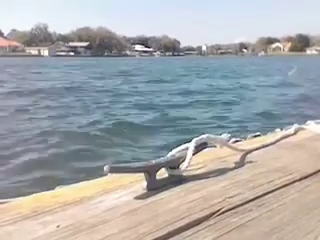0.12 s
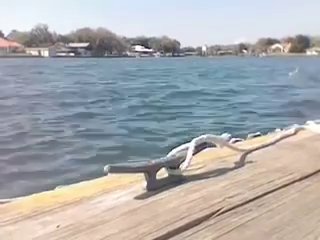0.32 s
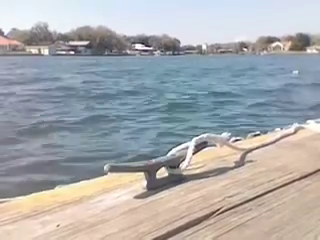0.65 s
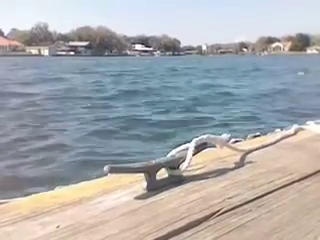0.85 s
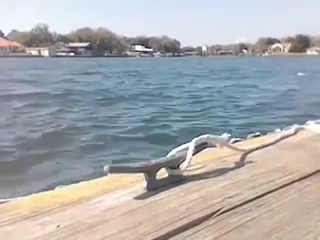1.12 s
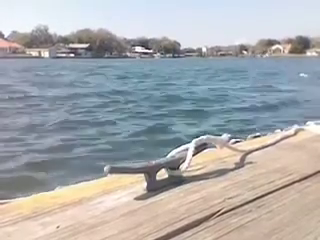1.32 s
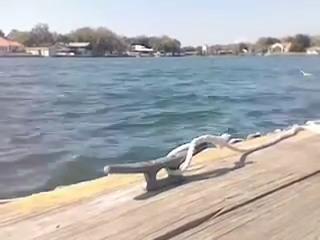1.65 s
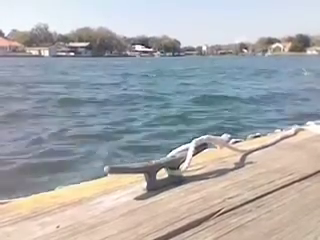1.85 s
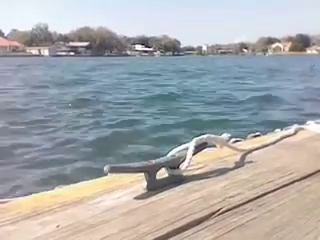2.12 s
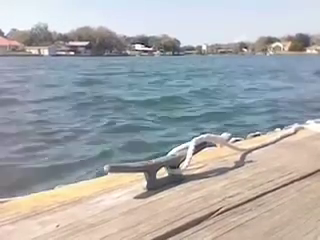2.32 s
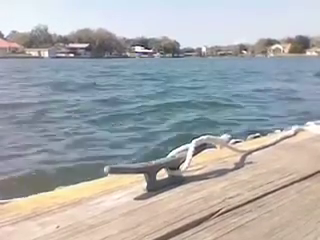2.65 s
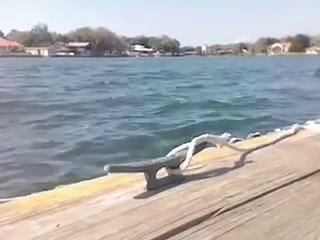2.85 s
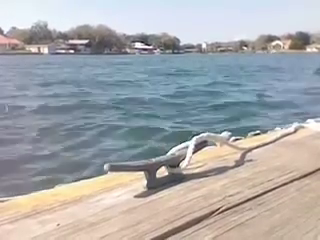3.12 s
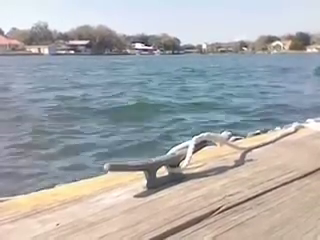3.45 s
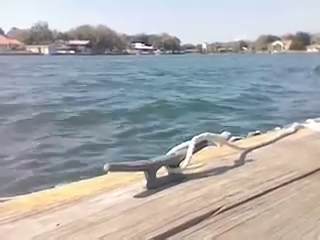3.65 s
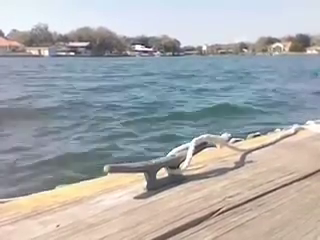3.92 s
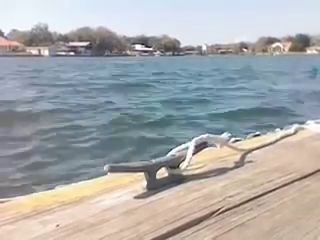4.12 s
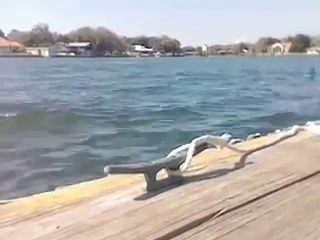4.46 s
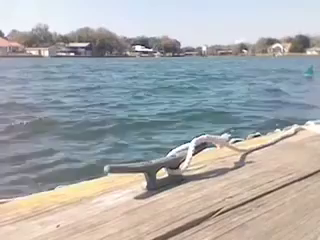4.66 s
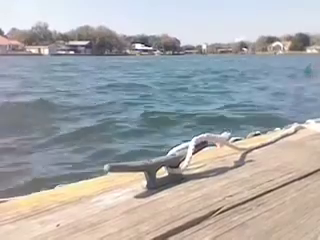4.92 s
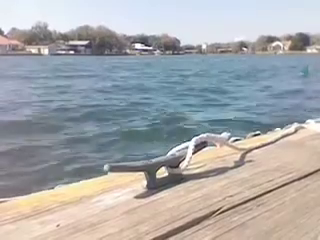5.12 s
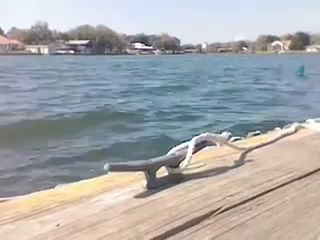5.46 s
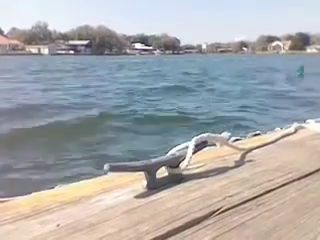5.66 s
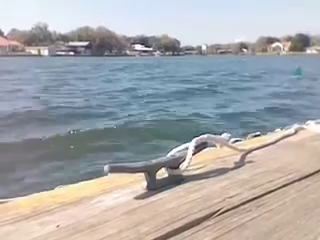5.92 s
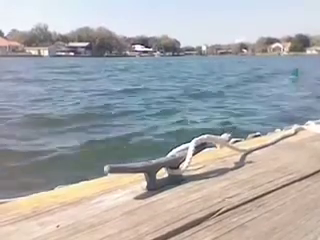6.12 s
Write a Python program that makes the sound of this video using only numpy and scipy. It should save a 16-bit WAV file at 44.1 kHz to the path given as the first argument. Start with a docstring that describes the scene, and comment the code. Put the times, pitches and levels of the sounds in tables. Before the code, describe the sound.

Small choppy waves lap, fizz and plop against a wooden dock while gusty wind thumps and rumbles on a small camera's bare microphone.

```python
"""Choppy wavelets slap a wooden dock: each one fizzes as a crowd of tiny bubbles on a rush of noise.
Single bubbles plop as damped sines with climbing pitch, spray spatters as short bands of noise, drops tick.
Wind eddies thump a small camera's bare microphone as short wave packets, with a rasp and a lumpy rumble;
the strongest overload it. A thin sine whine of the electronics sits over a gently drifting hiss."""
import sys
import numpy as np
from scipy import signal
from scipy.fft import rfft, irfft, next_fast_len
from scipy.io import wavfile
from scipy.ndimage import uniform_filter1d, map_coordinates

SR = 44100
rng = np.random.default_rng(int(sys.argv[2]) if len(sys.argv) > 2 else 0)


def put_to_file(sound):
    """Save the sound as 16-bit audio at rate SR, in the file named by the first command-line argument."""
    columns = np.atleast_2d(sound).T  # one column per channel
    safe = np.clip(columns, -1, 1)
    whole_steps = np.round(safe * 32767)
    wavfile.write(sys.argv[1], SR, whole_steps.astype(np.int16))


N = 276507


def amp(db):
    """Decibels to gain."""
    return 10 ** (np.asarray(db) / 20)


def unit(x):
    """Scaled to rms 1."""
    return x / np.sqrt(np.mean(x ** 2) + 1e-20)


def curves(rows):
    """One value per sample for each column after the time."""
    start, *columns = np.transpose(rows)
    return [np.interp(np.arange(N) / SR, start, column) for column in columns]


def wobble(rate):
    """A smooth random curve, rate knots a second."""
    knots = rng.standard_normal(int(N * rate / SR) + 4)
    return map_coordinates(knots, [np.arange(N) * rate / SR])


def coloured(x, points):
    """x filtered through (Hz, dB) points joined on a log frequency axis."""
    size = next_fast_len(len(x) + 8192)
    hz, db = np.transpose(points)
    bins = np.fft.rfftfreq(size, 1 / SR)
    gain = amp(np.interp(np.log(bins + 1), np.log(hz + 1), db))
    return irfft(rfft(x, size) * gain, size)[:len(x)]


def noise(points, patchy_db):
    """Coloured noise of rms 1 with patches of random gain in time and frequency."""
    grid = signal.stft(rng.standard_normal(N + 512), nperseg=256)[2]
    patches = uniform_filter1d(rng.standard_normal(grid.shape), size=4, axis=0)
    patches = uniform_filter1d(patches, size=4, axis=1)
    patchy = signal.istft(grid * amp(patchy_db * unit(patches)), nperseg=256)[1][:N]
    return unit(coloured(patchy, points))


def summed(start, shapes):
    """Rows of samples laid down at their start times."""
    at = np.round(start * SR).astype(int)[:, None] + np.arange(shapes.shape[1])
    return np.bincount(np.clip(at, 0, N).ravel(), shapes.ravel(), N + 1)[:N]


def humps(centre, db, rise, fall, hold):
    """Summed power of swells that climb to a peak, hold it (s) and fall away, at rise and fall dB a second."""
    t = np.arange(0, N + 64, 64) / SR  # worked out every 64 samples
    late = t[:, None] - centre
    level = db - np.where(late < 0, -late * rise, np.maximum(late - hold, 0) * fall)
    return np.interp(np.arange(N) / SR, t, np.sum(amp(2 * level), axis=1))


def camera():
    """Far lapping and circuit hiss as one coloured noise, with a thin whine as a sine."""
    # Colour of the hiss. Each row: frequency in Hz, relative level in dB per Hz.
    hiss_colour = [(240, -23.5), (400, -2.5), (821, -11), (1120, -11), (1420, -16), (1660, -14.5),
                   (7550, -37), (8280, -42), (8670, -39.5), (12500, -51), (15500, -66)]
    whine_hz, whine_db = 8000, -76
    whine = amp(whine_db + .3 * wobble(30)) * np.sin(2 * np.pi * whine_hz * np.arange(N) / SR)
    hiss = amp(-57 + 3.0 * wobble(7.3)) * noise(hiss_colour, patchy_db=0.0)
    return hiss + whine


def eddies(centre, db, hz, length_ms, phase):
    """Each eddy sucks at the membrane, which rocks briefly: a cosine in a bell, phase in cycles."""
    t = np.arange(-700, 700) / SR
    sigma_s = length_ms[:, None] * 0.00032
    bell = amp(db[:, None]) * np.exp(-.5 * (t / sigma_s) ** 2)
    return summed(centre + t[0], -bell * np.cos(2 * np.pi * (hz[:, None] * t + phase[:, None])))


def wind():
    """Strong eddies with a rasp on their edge, each in a swirl of small ones, over a lumpy rumble."""
    # Strong eddies on the microphone. Each row: centre in seconds, peak in dB ahead of the port,
    # pitch in Hz, nominal length in ms, rasp in dB against the peak (2 dB are taken off below).
    eddy_rows = [(0.033, -3, 251, 5.3, -26), (0.047, -15, 231, 9.8, -17), (0.059, -14.5, 317, 7.9, -10),
                 (0.215, -15.5, 309, 3.9, -15.5), (0.302, -21, 235, 8.6, -34), (0.328, -19.5, 164, 13, -20),
                 (0.364, -13, 212, 5.6, -32), (0.393, -12, 243, 3.7, -36), (0.42, -13, 370, 8.8, -8),
                 (0.437, -11, 175, 8.3, -31), (0.563, -16.5, 338, 2.6, -9.5), (0.645, -14, 278, 6, -28),
                 (0.658, -7.5, 208, 3.7, -20), (0.71, -23.5, 294, 8.2, -13), (0.754, -7, 198, 4.7, -46),
                 (0.777, -10, 172, 13, -46), (0.811, -6, 380, 4, -12), (0.821, -12.5, 231, 9.3, -23),
                 (0.843, -8.5, 234, 7.2, -15), (0.865, -28, 290, 8.1, -1.5), (1.063, -21, 388, 16, -5.5),
                 (1.112, -9.5, 285, 4.8, -17), (1.198, -26, 400, 2.7, 5), (1.223, -23.5, 270, 9.7, -10),
                 (1.34, -5.5, 237, 5.8, -34), (1.353, -10, 264, 4.5, -32), (1.408, -22.5, 333, 2.4, -5),
                 (1.605, -12.5, 222, 5.2, -33), (1.712, -12.5, 197, 2.1, -46), (1.755, -6.5, 276, 4.6, -23),
                 (1.794, -14, 308, 4.3, -20), (1.884, -16.5, 206.5, 11, -44), (1.934, -9.5, 187, 9.4, -28),
                 (1.952, -6.5, 270, 4.8, -40), (2.063, -8, 224, 3.9, -38), (2.093, -11, 211, 6.1, -32),
                 (2.132, -12, 287, 14.5, -12.5), (2.147, -3, 313, 5.2, -3), (2.218, -20, 250, 15, -11.5),
                 (2.411, -19, 199, 12, -28), (2.484, -5, 380, 3.6, -1), (2.49, -3.5, 270, 3.1, -5),
                 (2.499, -9, 308, 4.6, -5.5), (2.509, -23, 408, 2.2, -1.5), (2.579, -16, 212, 7.5, -36),
                 (2.662, -14.5, 217, 6.8, -34), (2.699, -16, 280, 5, -18), (2.714, -10, 263, 5.2, -24.5),
                 (2.727, -8.5, 320, 4.9, -20.5), (2.744, -14, 280, 7.8, -16.5), (2.777, -12, 210, 5, -28),
                 (2.791, -2.5, 270, 8.1, -16), (2.811, -14, 240, 5.7, -23.5), (2.86, -34, 272, 9.5, -22),
                 (2.92, -12.5, 212, 4.8, -38), (2.95, -12.5, 282, 7.3, -40), (3.005, -15.5, 214, 5.4, -25),
                 (3.048, -10.5, 394, 3.4, -2), (3.088, -4.5, 310, 4.1, -35), (3.101, 3, 224, 6.2, -20),
                 (3.106, 8.5, 222, 3.2, -7.5), (3.202, -13.5, 257, 7.1, -19), (3.227, -4.5, 237, 5.2, -19),
                 (3.263, -4.5, 266, 4.6, -36), (3.27, -10.5, 307, 2.6, -22), (3.311, -12.5, 280, 4, -18),
                 (3.439, -4.5, 263, 3.3, -17), (3.452, -12.5, 257, 3.5, -35), (3.459, -1.5, 274, 8.3, -28),
                 (3.465, -6, 420, 3, 0.5), (3.587, -12.5, 246, 6.2, -29), (3.605, -6, 222, 4.6, -45),
                 (3.627, -10.5, 221, 10, -36), (3.717, -12, 329, 6.4, -9), (3.748, -12.5, 197, 7.9, -29),
                 (3.779, -19, 292, 10, 1), (3.796, 2, 267, 4.9, -17), (3.825, -14, 205, 4.7, -18),
                 (3.849, -7, 270, 3.5, -23), (3.874, -11, 243, 5.2, -22), (3.887, -4, 222, 6.5, -12),
                 (3.943, -21, 227, 5.1, -40), (3.987, 1, 303, 5.5, -13), (4.008, -12.5, 384, 7.2, -6),
                 (4.04, -17, 324, 7.7, -18), (4.156, -15.5, 448, 3.1, -16), (4.166, -29.5, 290, 15, -9),
                 (4.249, -7.5, 270, 2.6, -27), (4.269, -14.5, 292, 9, -29), (4.329, 1.5, 238, 5.7, -43),
                 (4.433, -13.5, 379, 5.3, -19), (4.755, -24, 330, 5.9, -15), (4.779, -20, 310, 6.8, -22),
                 (4.868, -5, 284, 6.3, -38), (4.889, -18, 322, 2.7, -27), (4.931, -20, 200, 6.9, -36),
                 (4.948, 3, 279, 6.9, -11.5), (4.96, -1, 211, 6.7, -28), (4.974, -9.5, 246, 10.7, -8),
                 (5.033, -23, 237, 5.4, -15), (5.104, -25.5, 360, 25, -6), (5.129, -17.5, 385, 5, -2.5),
                 (5.28, -21, 220, 3.8, -33), (5.316, 0, 313, 4.8, -18), (5.33, -1.5, 245, 8.7, -13.5),
                 (5.485, -18, 175, 14, -38), (5.526, -14, 218, 4.1, -43), (5.592, -8.5, 305, 6.5, -18.5),
                 (5.609, -17.5, 260, 6.1, -22), (5.674, -6, 247, 4.5, -13.5), (5.692, -40.5, 323, 6.8, -16),
                 (6.147, -15, 273, 4.1, -31), (6.163, -8.5, 278, 6.3, -35), (6.195, -20, 320, 8.2, -28)]
    # Rumble between the eddies. Each row: time in seconds, relative level in dB, tilt of its upper part in dB.
    buffet = [(0.0, -44, 2), (0.33, -27.5, -1.5), (0.52, -39, -0.5), (1.08, -35.5, -2), (1.24, -31.5, 3),
              (1.43, -42, -0.5), (1.66, -61, 0), (1.94, -32, 2), (2.06, -23, -1.5), (2.23, -29.5, 2),
              (2.46, -45, -3), (2.69, -25.5, 0), (3.09, -33, -2.5), (3.53, -34, 3.5), (3.68, -28, -2),
              (3.87, -28, 0.5), (4.02, -39.5, -1.5), (4.64, -41, 1), (4.82, -54.5, 5.5),
              (4.94, -42.5, -1.5), (5.36, -45, -4.5), (5.5, -33, -3), (5.64, -60, -0.5), (5.9, -34, 4),
              (6.04, -37, 2), (6.27, -39, 3.5)]
    # Colours of rasp and rumble. Each row: frequency in Hz, relative level in dB per Hz.
    rasp_colour = [(250, -59), (350, -3.5), (550, 1), (900, -12.5), (1300, -23), (1800, -39), (2600, -64),
                   (4000, -120)]
    rumble_colour = [(15, -77), (25, -62), (91, -8), (183, -0.5), (374, -7), (433, -14), (762, -26.5),
                     (897, -58), (1200, -37), (1560, -63), (2640, -120)]
    # Wind through the low cut at the port. Each row: frequency in Hz, gain in dB.
    port = [(20, -53.5), (60, -9), (130, 1), (400, -3.5), (800, 6), (3000, -6)]
    swirl_db, swirl_builds_db_per_s, swirl_dies_db_per_s = -17, 1296, 309.5

    s, db, hz, length_ms, rasp_db = np.transpose(eddy_rows)
    strong = eddies(s, db, hz, length_ms, 0.044 * rng.standard_normal(len(s)))
    # at 0 Hz the packets are plain bells, used as envelopes
    edge = np.abs(eddies(s, db + rasp_db - 2, 0 * s, 1.09 * length_ms, 0 * s))
    # the rasp lingers a little while the air settles
    wake = signal.lfilter([.0012], [1, -np.exp(-1 / (0.024 * SR))], edge) * 0.49
    rasp = (edge + wake) * noise(rasp_colour, patchy_db=3.0)

    lumps = amp(7.44 * np.tanh(0.56 * wobble(80)))
    # a swirl builds up ahead of its eddy and dies more slowly after it
    swirl = humps(s, 0.68 * db + swirl_db, swirl_builds_db_per_s, swirl_dies_db_per_s, 0)
    level_db, tilt_db = curves(buffet)
    rumble = noise(rumble_colour, patchy_db=1.5)
    upper = coloured(rumble, [(180, -30), (300, 0)])
    rumble = rumble + (amp(tilt_db) - 1) * upper
    small = np.sqrt(swirl + amp(2 * level_db)) * unit(lumps) * rumble
    # a strong eddy sweeps the small ones off the port while it lasts
    sweep = np.abs(eddies(s, db, 0 * s, 0.71 * length_ms, 0 * s))
    small = small / (1 + 0.83 * sweep)
    return coloured(strong, port) + small + rasp


def ticks():
    """A drop on dry wood is one thin click: a single sample through a treble band."""
    # Dry ticks of single drops. Each row: start in seconds, relative level in dB.
    tick_rows = [(1.257, -34), (2.634, -52), (2.7785, -55), (3.0594, -56), (5.806, -55), (6.2254, -64)]
    s, db = np.transpose(tick_rows)
    clicks = summed(s + 0.00072, amp(db + 12)[:, None])
    return coloured(clicks, [(4000, -50), (5000, 13), (12500, 13.5), (14000, -29)])


def surf():
    """Gains of the fizz and of its bright spray: wavelets swell, hold and fade over the trickle."""
    # Breaking wavelets. Each row: crest in seconds, relative fizz level in dB, swell in ms, hold in ms,
    # fade in ms, spray against fizz in dB. Swell and fade are the times for 20 dB.
    wave_rows = [(.006, -37, 37, 65.6, 29, -5), (.406, -61.5, 39, 5, 150, -3.5),
                 (.8, -50, 450, 5, 190, -11), (.868, -39.5, 20, 31, 40, -0.5), (.894, -36.5, 8, 9.1, 30, 3),
                 (.915, -30, 25, 22, 50, -3), (.98, -38.5, 27, 40, 43, -2.5), (1.081, -39, 29, 32, 48, 0.5),
                 (1.15, -56, 30, 37, 26, 9.5), (1.744, -56, 15, 4.4, 59, -18),
                 (1.868, -45.5, 43, 5, 29, -31), (1.925, -49, 67, 98, 150, -4),
                 (2.091, -36, 14, 15, 45, -2.5), (2.12, -50.5, 20, 35, 34, 5.5),
                 (2.3, -49.5, 20, 42, 100, -8.5), (2.61, -60, 40, 44, 50, -11),
                 (2.856, -66, 180, 5, 52, -13), (3.13, -43.5, 40, 40, 60, -20),
                 (3.183, -35, 12, 20, 46, -8.5), (3.249, -35, 10, 23, 36, -9),
                 (3.32, -36.5, 147, 51, 45, 1.5), (3.424, -57, 20, 61, 36, 7.5),
                 (3.965, -65, 23, 11, 37, 19.5), (4.216, -47, 81, 20, 36, -4.5),
                 (4.248, -48.5, 13, 43, 36, 7.5), (4.335, -58, 21, 65, 33, 16),
                 (4.383, -50.5, 15, 54, 29, 6), (4.622, -56, 16, 5, 49, -10), (5.078, -44, 13, 51, 31, 1.5),
                 (5.191, -42.5, 41, 36, 52, 1.5), (5.505, -52.5, 38, 21, 31, -12),
                 (5.722, -67, 20, 8.7, 30, -26), (5.85, -44, 33, 28, 89, -14),
                 (5.984, -43.5, 31, 12.5, 27, -1.5), (6.15, -54, 200, 5, 160, -3.5)]
    # Trickle between the waves. Each row: time in seconds, relative level in dB.
    trickle_rows = [(0, -64.5), (.55, -68.5), (1.3, -59.5), (1.7, -66), (2.3, -58.5), (2.7, -66.5),
                    (3.08, -60.5), (3.6, -69.5), (3.85, -65), (4.1, -62.5), (4.5, -62), (4.75, -81),
                    (5.02, -58), (5.42, -64), (5.8, -68.5), (6.27, -65)]
    trickle_bright_db = -5.5
    s, db, swell_ms, hold_ms, fade_ms, bright_db = np.transpose(wave_rows)
    shape = 20 * 1000 / swell_ms, 20 * 1000 / fade_ms, hold_ms / 1000
    trickle = amp(2 * curves(trickle_rows)[0])
    body = np.sqrt(humps(s, db, *shape) + trickle)
    spray = np.sqrt(humps(s, db + bright_db, *shape) + trickle * amp(2 * trickle_bright_db))
    return body, spray


def sprinkle(count):
    """Lesser drops at chance moments, their level following the spray around them."""
    over_spray_db, middle_hz = 10.5, 6900  # spatter() lowers all drops by 9 dB
    at, g = rng.integers(N, size=count), rng.standard_normal((count, 2))
    db = 20 * np.log10(surf()[1][at]) + over_spray_db + 4 * g[:, 0]
    hz = np.clip(middle_hz * np.exp(.3 * g[:, 1]), 3000, 10500)
    return np.c_[at / SR, db, hz]


def spatter():
    """Drops burst on the wood: a sharp start and a short band of hiss."""
    # Spray on the boards. Each row: start in seconds, relative level in dB, centre in Hz.
    drop_rows = [(0.126, -41, 6840), (0.598, -38.5, 4560), (0.7785, -43, 6910), (0.8673, -32, 6800),
                 (0.893, -29, 5480), (1.0822, -25.5, 7800), (1.163, -32, 6260), (1.1756, -25, 5600),
                 (1.5868, -38, 5700), (1.661, -38, 8100), (1.913, -30.5, 8600), (1.928, -25.5, 5400),
                 (1.9725, -24.5, 7400), (2.0925, -25.5, 6400), (2.117, -34, 5800), (2.246, -43, 8800),
                 (2.298, -32, 6300), (2.321, -32.5, 6800), (2.372, -35, 8700), (2.437, -37.5, 7450),
                 (3.145, -34, 6400), (3.252, -29, 7200), (3.3396, -19, 7100), (3.3857, -28.5, 7700),
                 (3.4382, -24, 7900), (3.9696, -27.5, 6570), (4.214, -28, 4450), (4.231, -32, 5200),
                 (4.2461, -24, 7450), (4.2702, -33, 6850), (4.289, -30, 6720), (4.335, -24.5, 9200),
                 (4.383, -24, 4860), (4.395, -30, 5030), (4.4406, -34, 7500), (4.7285, -44, 9700),
                 (5.0783, -25.5, 7500), (5.1653, -28.5, 10000), (5.205, -27.5, 8950), (5.2983, -38, 4700),
                 (5.3428, -46.5, 8300), (5.857, -36, 10200), (5.91, -34, 7060), (5.928, -35, 6100),
                 (5.9833, -32, 4600), (6.0995, -44, 6800), (6.1528, -32.5, 10800), (6.253, -47, 10000)]
    spread_octaves, t60_s = 0.25, 0.032
    edge = 2 ** spread_octaves
    out, t = np.zeros(N + 4000), np.arange(4000) / SR
    for s, db, hz in np.vstack([drop_rows, sprinkle(count=260)]):
        band = [(hz / edge ** 2, -40), (hz / edge, -6), (hz, 0), (hz * edge, -6), (hz * edge ** 2, -40)]
        burst = unit(coloured(rng.standard_normal(len(t)), band))
        attack = 1 - np.exp(-t / 0.00051)
        out[round(s * SR):][:len(t)] += amp(db - 9.0 - 60 * t / t60_s) * attack * burst
    return out[:N]


def bubbles(start, db, hz, t60, rise, size):
    """Damped sines with a soft start, whose pitch climbs as the bubble nears the surface."""
    t = np.arange(size) / SR
    hz, t60 = hz[:, None], t60[:, None]
    swell = 1 - np.exp(-t / (0.077 * t60))
    # the pitch has climbed by twice the rise share after one t60
    ring = np.sin(2 * np.pi * hz * t * (1 + rise * t / t60))
    return summed(start, amp(db[:, None] - 60 * t / t60) * swell * ring)


def strays(count):
    """Lesser bubbles at chance moments, their level following the fizz around them."""
    over_fizz_db, middle_hz, middle_t60_ms = 0.8, 2896, 28  # plops() lifts these by 6 dB
    at, g = rng.integers(N, size=count), rng.standard_normal((count, 3))
    db = 20 * np.log10(surf()[0][at]) + over_fizz_db + 4 * g[:, 0]
    hz = middle_hz * np.exp(.33 * g[:, 1])
    return np.c_[at / SR, db, hz, middle_t60_ms * np.exp(.35 * g[:, 2])]


def plops():
    """Single bubbles beside the fizz: a fast random flutter roughens the ring of all but the far climbers."""
    # The clearest single bubbles. Each row: start in seconds, relative level in dB, start pitch in Hz, t60 in ms.
    bubble_rows = [(0.443, -23, 1305, 34), (0.612, -35.5, 3150, 16), (0.724, -39, 3630, 17),
                   (0.759, -34, 1610, 21), (0.761, -32.5, 2890, 16), (0.866, -27, 1920, 25),
                   (0.893, -25, 3950, 12), (0.916, -20.5, 1355, 19), (1.741, -41.5, 3070, 26),
                   (1.866, -20, 1770, 12), (1.932, -31, 3153, 31), (1.97, -30.5, 3420, 20),
                   (2.01, -35, 2230, 22), (2.017, -33.5, 3940, 23), (2.052, -36, 3720, 21),
                   (2.093, -33, 1650, 19), (2.343, -37.5, 2020, 27), (2.527, -43, 2010, 25),
                   (2.633, -23.5, 1520, 9.1), (3.182, -28, 1540, 16), (3.249, -34, 1850, 25),
                   (3.341, -32.5, 3320, 84), (4.246, -37, 3370, 40), (4.352, -36, 3500, 20),
                   (4.396, -39, 3220, 23), (4.619, -47, 2350, 25), (4.675, -42.5, 4540, 25),
                   (5.072, -32.5, 1033, 65), (5.14, -30, 1210, 43), (5.502, -34, 1920, 17),
                   (5.503, -37.5, 1100, 28), (5.724, -35.5, 2340, 11), (5.806, -36.5, 1550, 18),
                   (5.85, -19, 1890, 4.9), (5.952, -37.5, 1088, 63), (5.984, -39, 1515, 47)]
    # Bubbles that climb far in pitch. Each row: start in seconds, level in dB ahead of the soft start,
    # start pitch in Hz, t60 in ms, rise as a share of the pitch.
    climber_rows = [(.139, -24.5, 645, 95, 0.74), (1.415, -37.5, 1514, 70, .5)]
    s, db, hz, t60_ms = np.transpose(np.vstack([bubble_rows, strays(count=180)]))
    fluttering = bubbles(s, db + 6, hz, t60_ms / 1000, rise=.03, size=2600)
    # each drags two neighbours of nearby pitch, relatively stronger where the pitch is high
    for delay, detune in rng.standard_normal((2, 2, len(s))):
        near_hz = hz * np.exp(0.14 * detune)
        near_db = db - 9.5 + hz / 600
        near_s = s + 0.0031 * np.abs(delay)
        fluttering = fluttering + bubbles(near_s, near_db, near_hz, t60_ms / 1400, rise=0.086, size=2600)
    s, db, hz, t60_ms, rise = np.transpose(climber_rows)
    climbing = bubbles(s, db, hz, t60_ms / 1000, rise=rise[:, None], size=4000)
    return fluttering * amp(1.77 * wobble(450)) + climbing


def under_dock(x):
    """Piles and boards scatter the water's sound into a short blur of decaying noise tails."""
    t = np.arange(SR // 8) / SR
    parts = np.array_split(x, 24)  # each stretch gets its own scatter
    tails = rng.standard_normal((len(parts), len(t))) * amp(-60 * t / 0.15)
    out, at = np.zeros(N + len(t)), 0
    for part, tail in zip(parts, tails):
        blur = signal.fftconvolve(part, tail / np.linalg.norm(tail))
        out[at:][:len(blur)] += blur
        at += len(part)
    return amp(-0.5) * x + amp(-7.5) * out[:N]


def waves():
    """A wavelet breaks into a crowd of tiny bubbles on a rush; bright waves throw more spray."""
    # Colour of crowd and rush. Each row: frequency in Hz, relative level in dB per Hz.
    fizz_colour = [(590, -38.5), (1000, -11.5), (1320, -7), (1920, -1.5), (2230, -5.5), (3300, -4.5),
                   (3700, -5), (6950, -11), (10700, -14), (13800, -29.5), (15500, -48)]
    body, spray = surf()
    u, g = rng.random(6000), rng.standard_normal((2, 6000))
    hz = np.clip(4800 * np.exp(0.6 * g[0]), 1200, 14000)
    # low bubbles ring longer
    crowd = bubbles(u * N / SR, 5.9 * g[1], hz, .004 + 35 / hz, rise=0.079, size=700)
    rush = noise(fizz_colour, patchy_db=1.5)
    fizz = unit(unit(coloured(crowd, fizz_colour)) + 1.25 * rush) * amp(2.42 * wobble(70))
    low = coloured(fizz, [(4500, -2.5), (6500, -37)])
    bright = amp(0.27 + 2.9 * wobble(45)) * spray * unit(fizz - low)
    return amp(-5.5) * (body * unit(low) + bright)


def scene():
    """Wind, water and the camera's own floor."""
    return (wind() + waves() + under_dock(plops()) + ticks() + spatter() + camera())[None]


def record(dry):
    """The input stage clips peaks flat; deep bass is thinned and the treble stops at a band limit."""
    top_hz = 15700
    clipped = np.clip(dry[0], -.81, .86)
    return coloured(clipped, [(20, -5), (50, 0), (top_hz - 100, 0), (top_hz, -90)])[None]


dry = scene()
out = record(dry)
put_to_file(out)
```